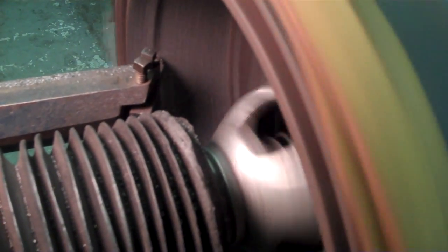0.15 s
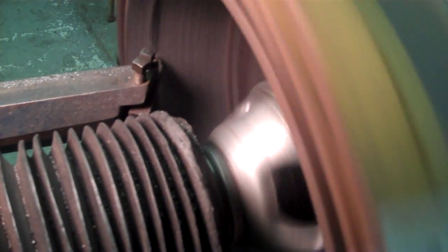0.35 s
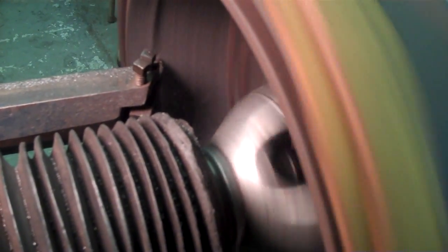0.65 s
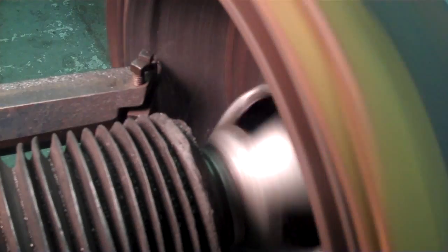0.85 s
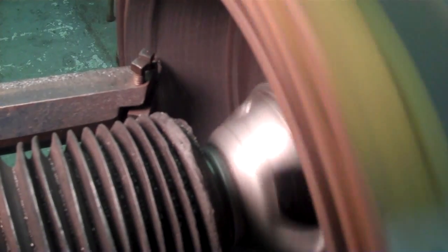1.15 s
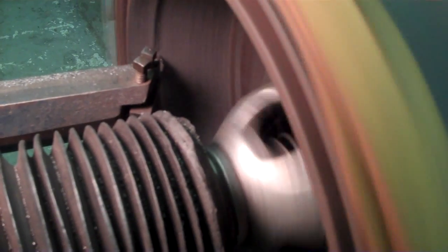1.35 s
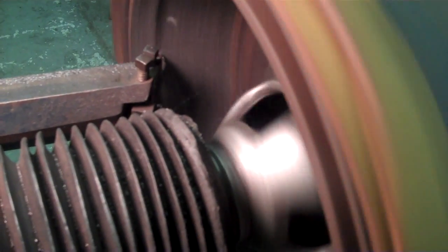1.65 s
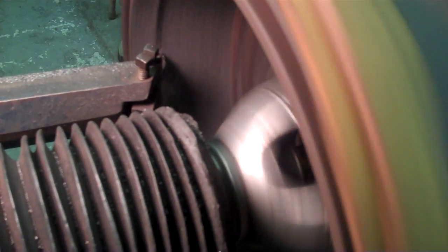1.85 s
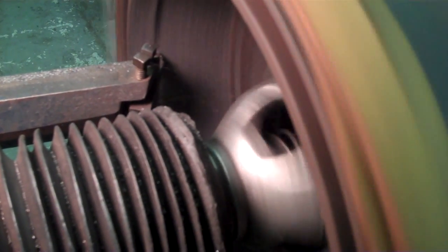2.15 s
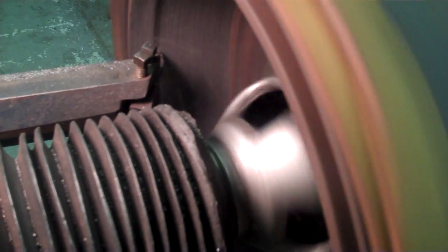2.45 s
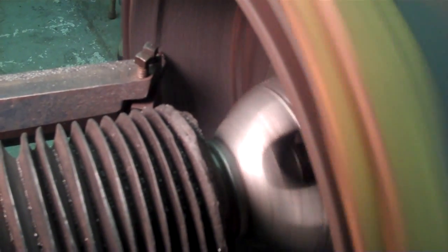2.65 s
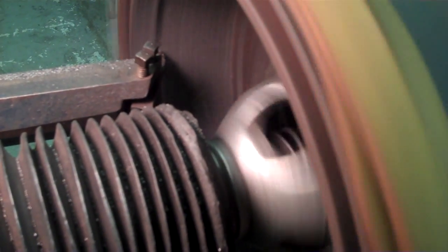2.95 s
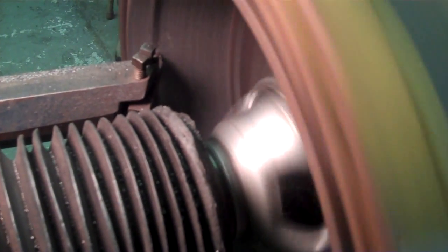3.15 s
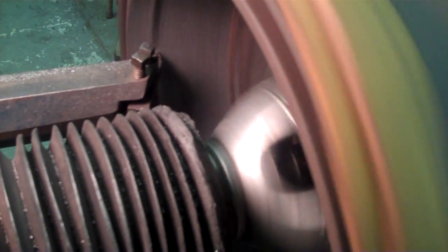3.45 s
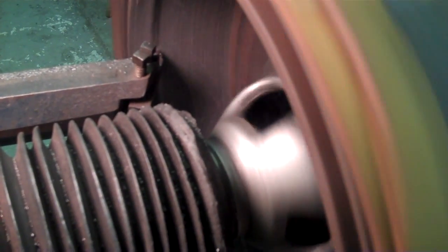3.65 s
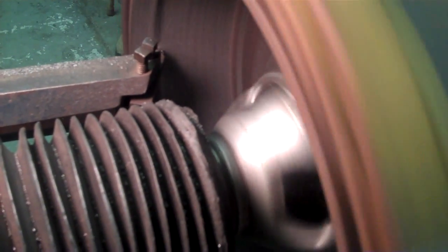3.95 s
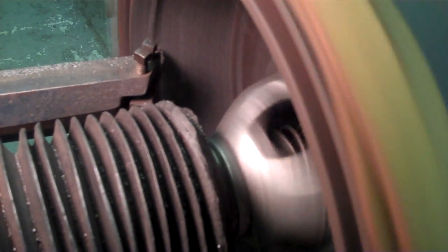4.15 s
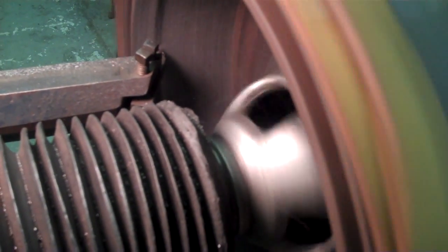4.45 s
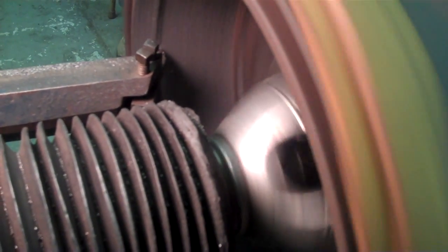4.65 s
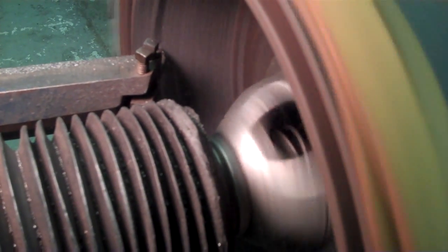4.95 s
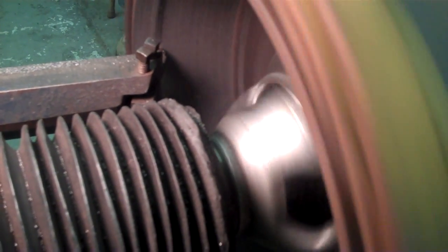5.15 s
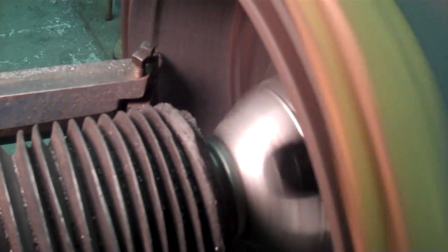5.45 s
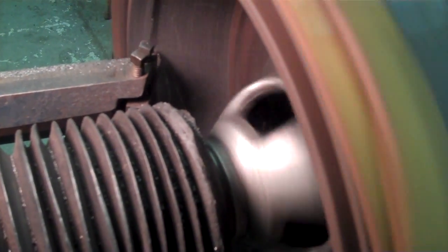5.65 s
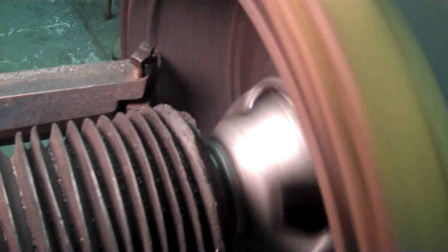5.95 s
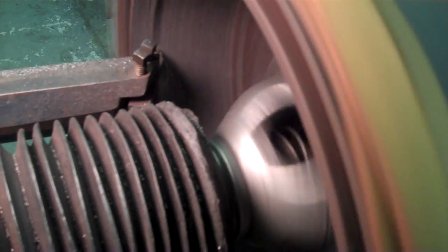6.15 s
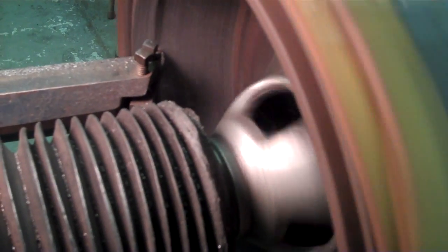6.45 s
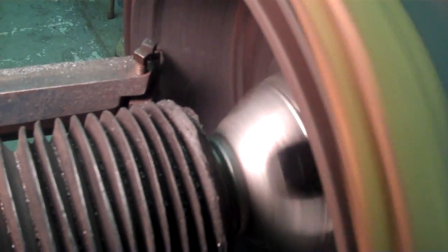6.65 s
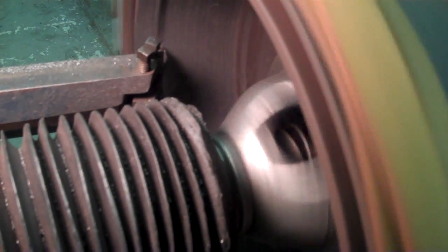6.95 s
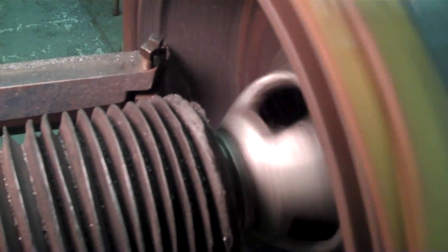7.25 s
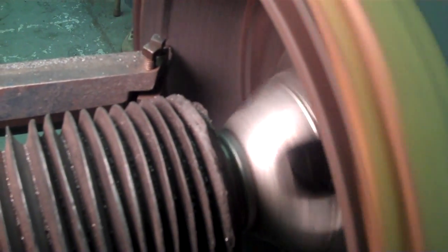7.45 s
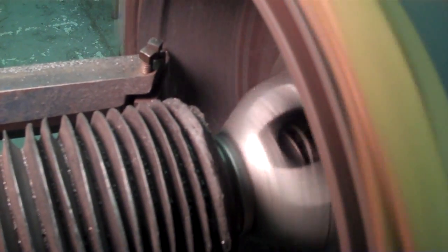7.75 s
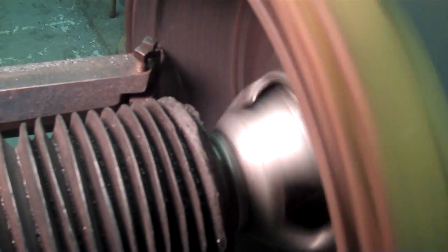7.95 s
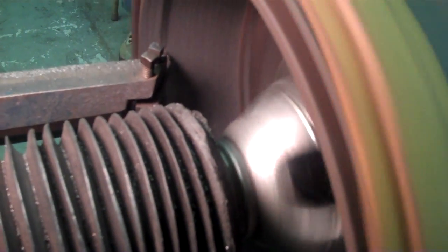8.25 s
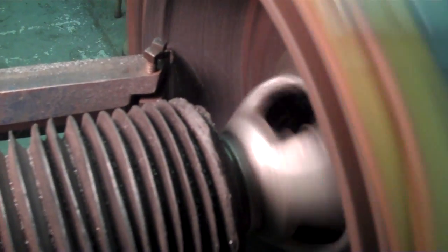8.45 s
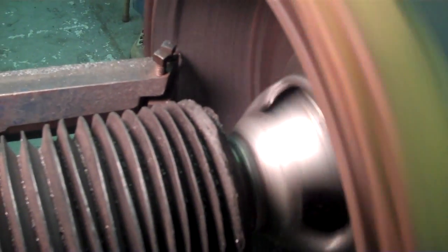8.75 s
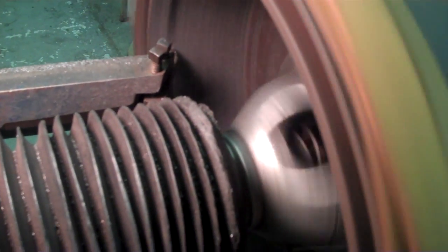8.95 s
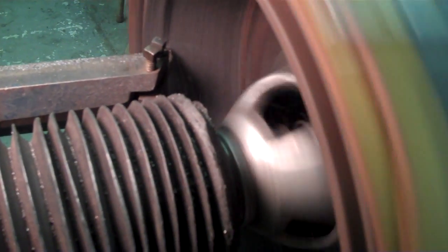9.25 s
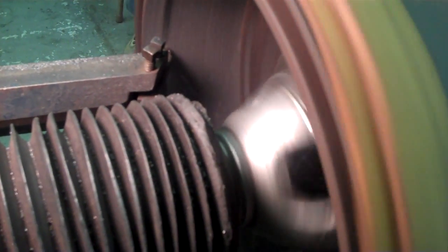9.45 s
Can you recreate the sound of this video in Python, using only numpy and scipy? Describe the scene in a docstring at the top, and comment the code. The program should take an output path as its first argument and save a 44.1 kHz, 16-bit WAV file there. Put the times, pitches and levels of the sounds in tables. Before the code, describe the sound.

From the first moment to the end, about ten seconds later, a lathe bit skims a spinning metal brake drum, very close to the microphone. The main sound is a bright, gritty rasp mixed with several high, ringing metallic tones. It swells and eases once per turn, about every 0.4 seconds, with lower ringing notes flaring briefly on each rotation. The pace and overall level stay steady. The scrape is wide, and its highest hiss leans to the left. Underneath, the motor gives a much quieter, constant hum and rumble. Soft, short, low thuds touch the left side of the microphone at irregular moments, the clearest near 0.1, 2.1, 3.7, 4.1, 7.4 and 8.1 seconds, with fainter ones in between. The cutting never pauses.

```python
"""A bright, ringing rasp that swells and eases once a turn: a brake lathe skimming an out-of-round
cast-iron drum, a hand's width from a phone with two microphone ports. Chips breaking off the bit
ring the drum and the boring bar, and a broad scrape fills the space between their modes.
Soft thuds reach the left port, and the motor hums underneath."""
import sys
import numpy as np
from scipy import signal
from scipy.fft import rfft, irfft
from scipy.io import wavfile
from scipy.ndimage import uniform_filter1d

SR = 44100
rng = np.random.default_rng(int(sys.argv[2]) if len(sys.argv) > 2 else 0)


def generate_wav(signal):
    """Clip the signal to [-1, 1] and save it as 16-bit WAV at the path in sys.argv[1]."""
    frames = np.transpose(np.atleast_2d(signal))
    scaled = np.clip(frames, -1, 1) * 32767
    pcm = np.round(scaled).astype(np.int16)
    wavfile.write(sys.argv[1], SR, pcm)


N = 423360

# The ring of drum and bar. Each row: pitch in Hz, pole width in Hz, left and right level in dB.
RING_MODES = [(739.6, 87, -38.5, -41), (1075, 70, -46, -44.5), (1390.4, 145, -35, -33.5),
              (2448, 115, -28.8, -29.3), (2637, 88, -38.5, -37.0), (2819, 27, -37.5, -43.5),
              (3430, 130, -31.5, -35), (3743, 246, -35, -35), (3942, 60, -35.5, -33.5),
              (4805, 170, -44, -33.5), (5290, 120, -110.0, -33.5), (5708, 100, -34.5, -33),
              (5980, 320, -34, -29), (6590, 110, -108.7, -32), (6870, 150, -30.5, -31.5),
              (7200, 140, -29.5, -46), (7490, 65, -28.5, -45.4), (7770, 180, -25.5, -37),
              (8150, 220, -22.5, -38), (8350, 135, -20.6, -33.9), (8565, 110, -22, -34),
              (8870, 270, -29.5, -42), (9546, 130, -32.5, -110.0), (9750, 260, -110.0, -45.3),
              (10750, 305, -41, -60), (12000, 400, -40.5, -60), (12506, 312, -47.8, -69.3),
              (12800, 170, -49.5, -69.1), (13297, 305, -49, -70), (13722, 104, -52, -75.0)]
# Spots on the drum where a mode flares or fades. Each row: rough pitch of the mode in Hz,
# place and width in turns, boost in dB.
MODE_FLARES = [(1070, 0.92, 0.099, 6), (1382, .13, 0.057, 7), (1382, 0.896, 0.035, 7.5),
               (1382, .35, .06, -1.5), (1382, .52, 0.031, 3), (2445, 0.93, .03, 4.5),
               (2445, 0.34, 0.015, 3.5), (2630, 0.083, .04, 6), (3430, 0.81, 0.048, 4.5),
               (6900, .06, .08, 2)]
# How hard ring and scrape ride the cut. Each row: frequency in Hz, dB of swing per dB of force.
FORCE_RESPONSE = [(700, 1.3), (1400, 0.12), (3000, 1.05), (8000, 1.42), (12000, 1.65)]
# Stereo spread of the ring. Each row: frequency in Hz, phase lead of the right port in radians.
RIGHT_LEAD = [(1400, .1), (3500, -.2), (3950, -1.2), (4840, -1), (5700, .7), (6000, -1.8), (6900, -1.3),
              (7200, 1.2), (8400, 1.5)]
def drum_ring(force_db, treble_db, turns, grit):
    """Breaking chips ring each mode of drum and bar; each port hears its own level and phase."""
    out = np.zeros((2, N))
    for hz, width_hz, left_db, right_db in RING_MODES:
        drive_db = over_hz(FORCE_RESPONSE, hz) * force_db + treble_db * (hz > 6000) + 1.45 * walk(25)
        for flare_hz, place, width, boost_db in MODE_FLARES:
            if abs(flare_hz / hz - 1) < .03:
                drive_db += boost_db * spot(turns, place, width)
        ring = resonance(undb(drive_db) * grit * rng.standard_normal(N), hz, width_hz)
        out[0] += undb(left_db) * ring.real
        out[1] += undb(right_db) * (ring * np.exp(1j * over_hz(RIGHT_LEAD, hz))).real
    return out


# The colour of the scrape. Each row: frequency in Hz, left and right base level in dB per Hz.
SCRAPE_COLOUR = [(600.0, -72.5, -74), (880, -67, -78.5), (1140, -68.5, -75.5), (1790, -65.5, -67.9),
                 (2200.0, -62, -62.8), (2900, -64.5, -64.5), (3980, -63, -64.5), (4860, -60, -60.5),
                 (6260, -60.5, -60.6), (7600.0, -54.5, -65), (9030, -58, -82), (10120, -66, -84),
                 (11400.0, -71.5, -110.0), (13900.0, -80.5, -106.7)]
# The scrape widens toward the top. Each row: frequency in Hz, likeness of the ports from 0 to 1.
SCRAPE_LIKENESS = [(300, 1), (2500, 0.75), (4000, 0.32), (6000, 0.09), (10000, 0)]
# Notches where neighbouring modes cancel. Each row: centre in Hz, width in Hz, gain in dB.
NOTCHES = [(930, 38, -4), (1200, 48, -9), (3035, 65, -10), (4240, 90, -8), (6400, 73, -2), (9900, 120, -5),
           (11400, 250, -3), (13550, 120, -8)]
def bit_scrape(force_db, treble_db, grit, ripple_db=3.0):
    """The bit's broad rasp, in octave bands that each ride the cutting force by their own amount."""
    hz = np.arange(N // 2 + 1) * SR / N
    notch_db = sum(db * np.exp(-((hz - mid_hz) / width_hz) ** 2) for mid_hz, width_hz, db in NOTCHES)
    # countless weak modes ripple the spectrum: some 35 Hz wide, deeper in the treble
    ripple_depth = ripple_db * np.clip(hz / 6000, .45, 1)
    shared, left, right = [walk(130)[:len(hz)] * ripple_depth for _ in range(3)]
    left_db = over_hz(SCRAPE_COLOUR, hz) + notch_db + .8 * shared + .6 * left
    right_db = over_hz(SCRAPE_COLOUR, hz, column=2) + notch_db + .8 * shared + .6 * right
    low_cut = 1 / (1 + (450 / (hz + 1)) ** 4)
    spectra = noise_spectra(left_db, right_db, over_hz(SCRAPE_LIKENESS, hz)) * low_cut
    out = 0
    for mid_hz in (400, 800, 1600, 3200, 6400, 12800):
        band = np.clip(1 - np.abs(np.log2(np.clip(hz, 400, 12800) / mid_hz)), 0, 1)
        ride_db = over_hz(FORCE_RESPONSE, mid_hz) * force_db + treble_db * (mid_hz > 6000)
        out += irfft(spectra * band, N) * unit(undb(ride_db + 1.1 * walk(14)))
    return out * (.7 + 0.34 * grit)


# Slow drift as the bit feeds across. Each row: time in seconds, force in dB, treble lift in dB.
FEED_DRIFT = [(0, -2, 0), (1.6, -0.5, -1), (3.2, -1.5, 0), (4.8, -1, 0), (6.4, -1.5, -0.5), (8, -1, 0.1),
              (9.6, -1.5, -0.6)]
# Hollows where the bit nearly lifts, different on odd and even turns.
# Each row: place in turns within a two-turn cycle, width in turns, force change in dB.
HOLLOWS = [(.62, .075, -2.1), (1.69, .055, -3.2)]
def cutting_force(turn_s=.4012, ease_turns=.72, ease_db=-3.2):
    """The cut is deepest at the drum's high spot, eases round the turn, then bites in again."""
    t = np.arange(N) / SR
    turns = t / turn_s
    times, feed_db, treble_db = np.transpose(FEED_DRIFT)
    depth_db = np.interp(turns % 1, [0, ease_turns, 1], [0, ease_db, 0])
    depth_db += sum(db * spot(turns, place, width, every=2) for place, width, db in HOLLOWS)
    force_db = depth_db + np.interp(t, times, feed_db) + 0.45 * walk(8)
    return force_db, np.interp(t, times, treble_db), turns


def chip_grit(scatter_db=1.0, chips_per_s=900):
    """Chips break off one after another, each with its own size: a gritty, stepped gain."""
    hold = int(SR / chips_per_s)
    sizes = undb(scatter_db * rng.exponential(size=N // hold + 1))
    return unit(np.repeat(sizes, hold)[:N])


# The standout thuds, probably chips striking the phone by its left port.
# Each row: start in seconds, left peak in dB, push time in milliseconds.
LOUD_THUDS = [(.082, -22, .9), (.467, -27, .5), (.552, -31, 1.4), (1.285, -28, .5), (1.355, -29, .9),
              (2.063, -30, 1.1), (2.096, -16, .3), (3.697, -22.5, 0.85), (3.713, -21.5, 1.2),
              (4.095, -23, .6), (5.745, -27, .6), (7.355, -22, .5), (8.066, -22, 0.44), (8.554, -27, 0.69),
              (9.279, -25, 0.49)]
def port_thuds(turns, tries_per_s=25, faint_db=-40, spread_db=8, leak_db=-14):
    """Single low pushes on the left port that leak to the right; faint ones crowd early in each turn."""
    when, size, chance, length = rng.random((int(tries_per_s * N / SR), 4)).T
    place = turns[(when * N).astype(int)] % 1
    odds = .1 + np.exp(-((place - .22) / .17) ** 2)
    faint = np.transpose([when * N / SR, faint_db + spread_db * size ** 2, .3 + .7 * length])
    out = np.zeros(N + SR)
    for start_s, peak_db, push_ms in np.vstack([LOUD_THUDS, faint[chance < odds]]):
        age = np.arange(SR // 30) / SR * 1000 / push_ms
        at = max(int((start_s - push_ms / 1000) * SR), 0)
        push = age * np.exp(-age) * (1 - age / 2)  # a quick dent, then a slower swing back
        out[at:at + len(push)] -= undb(peak_db) * push / push.max()
    return out[:N] * np.array([[1], [undb(leak_db)]])


# The rumble bed. Each row: frequency in Hz, base level in dB per Hz.
RUMBLE_COLOUR = [(20, -90), (60, -83.5), (130, -81), (320, -75.5), (620, -75), (900, -97)]
# The rumble is widest at the bottom. Each row: frequency in Hz, likeness of the ports from 0 to 1.
RUMBLE_LIKENESS = [(30, 0), (70, .3), (150, .6), (700, .75)]
# The drone of frame and gearbox. Each row: pitch in Hz, pole width in Hz, level in dB before panning.
FRAME_MODES = [(215, 27, -54), (244, 12, -58.5), (281.4, 19, -60), (364.2, 27, -54.5), (470, 55, -54),
               (557, 43, -53.5), (694, 25, -59), (728, 18, -43.5), (773, 56, -47.5), (863, 37, -55.5),
               (978, 30, -56.5), (1071, 18, -51), (1123, 25, -57.5)]
# The motor's hum tones. Each row: pitch in Hz, base level in dB.
HUM_TONES = [(29.6, -70), (76, -63), (119.8, -58), (150, -61), (203, -61.5)]
def motor(lean_db=0.46):
    """The drive rumbles, shakes the lathe's frame and hums with a slight waver, panned a touch left."""
    hz = np.arange(N // 2 + 1) * SR / N
    rumble_db = over_hz(RUMBLE_COLOUR, hz) - 20 * np.log10(1 + (hz / 1500) ** 2)
    out = irfft(noise_spectra(rumble_db, rumble_db, over_hz(RUMBLE_LIKENESS, hz)), N)
    for mode_hz, width_hz, mode_db in FRAME_MODES:
        out += undb(mode_db) * resonance(rng.standard_normal(N), mode_hz, width_hz).real
    for tone_hz, tone_db in HUM_TONES:
        phase = 2 * np.pi * np.cumsum(tone_hz * (1 + 0.00302 * walk(2.8))) / SR
        out += np.sqrt(2) * undb(tone_db + 1.1 * walk(4)) * np.sin(phase)
    return out * undb(np.array([[lean_db], [-lean_db]]))


def resonance(drive, hz, width_hz):
    """A complex pole applied twice, so the valleys between modes stay dark; each part has rms 1."""
    pole = np.exp((2j * hz - width_hz) * np.pi / SR)
    return np.sqrt(2) * unit(signal.lfilter([1], [1, -2 * pole, pole ** 2], drive))


def noise_spectra(left_db, right_db, likeness):
    """Spectra of two partly alike noises, their colours given in dB per Hz."""
    left, other = rfft(rng.standard_normal((2, N)))
    likeness = np.clip(likeness, 0, 1)
    right = likeness * left + np.sqrt(1 - likeness ** 2) * other
    return np.sqrt(SR / 2) * np.array([undb(left_db) * left, undb(right_db) * right])


def spot(turns, place, width, every=1):
    """A bell-shaped bump at one place that comes back every so many turns."""
    distance = (turns - place + every / 2) % every - every / 2
    return np.exp(-(distance / width) ** 2 / 2)


def walk(rate):
    """A wobble of rms 1 that glides to a new random level `rate` times a second."""
    hold = int(SR / rate)
    steps = np.repeat(rng.standard_normal(N // hold + 1), hold)
    return unit(uniform_filter1d(steps, hold)[:N])


def over_hz(table, hz, column=1):
    """A table column at hz, interpolated on a log-frequency axis."""
    rows = np.array(table, float)
    return np.interp(np.log(np.maximum(hz, 1)), np.log(rows[:, 0]), rows[:, column])


def undb(db):
    return 10 ** (np.asarray(db) / 20)


def unit(x):
    return x / np.sqrt(np.mean(np.abs(x) ** 2))


def scene():
    """Ring and scrape share one force and one stream of chips; motor and thuds sit beneath."""
    force_db, treble_db, turns = cutting_force()
    grit = chip_grit()
    cut = drum_ring(force_db, treble_db, turns, grit) + bit_scrape(force_db, treble_db, grit)
    return cut + motor() + port_thuds(turns)


def record(dry):
    """The phone rounds off peaks near full scale and cuts the top."""
    knee, ceiling, top_hz = .6, .88, 14100
    headroom = ceiling - knee
    excess = np.maximum(np.abs(dry) - knee, 0)
    rounded = np.sign(dry) * (np.minimum(np.abs(dry), knee) + headroom * np.tanh(excess / headroom))
    return signal.sosfilt(signal.ellip(14, .3, 80, top_hz, fs=SR, output="sos"), rounded)


dry = scene()
out = record(dry)
generate_wav(out)
```